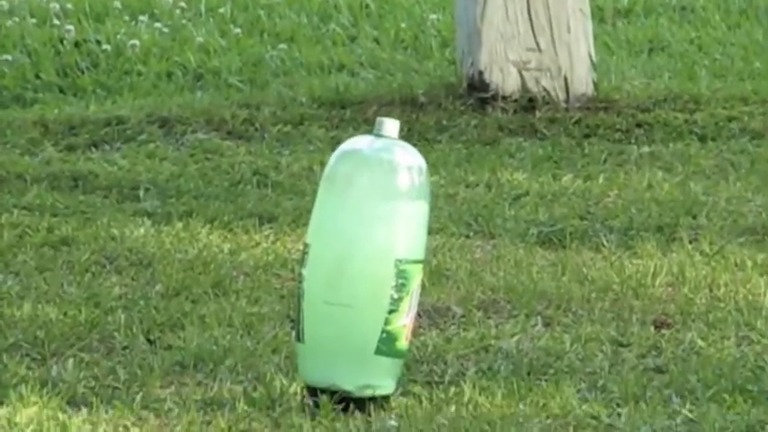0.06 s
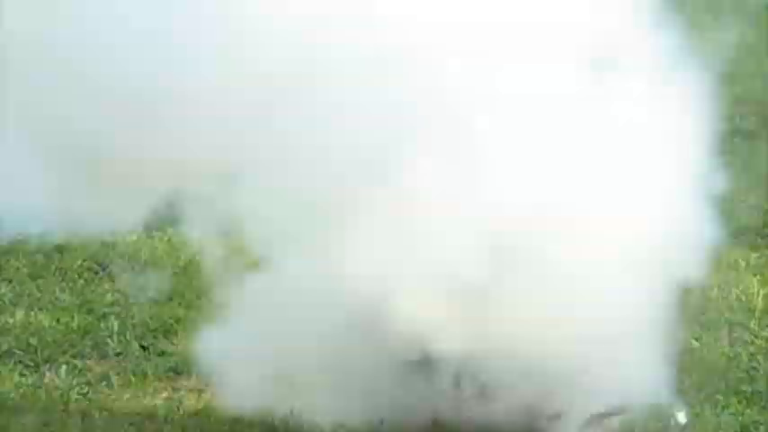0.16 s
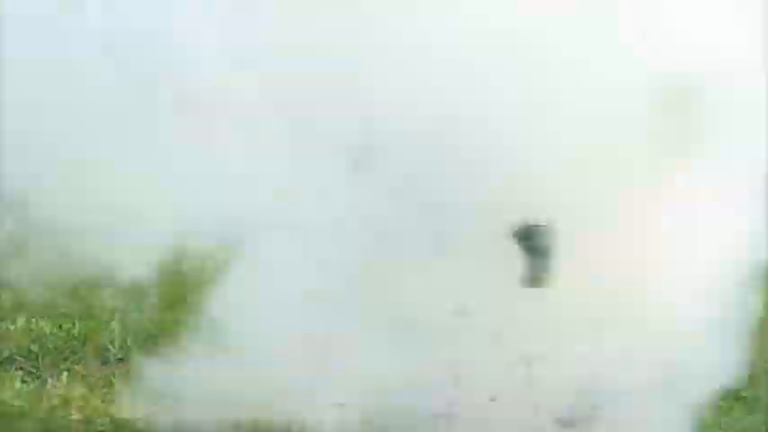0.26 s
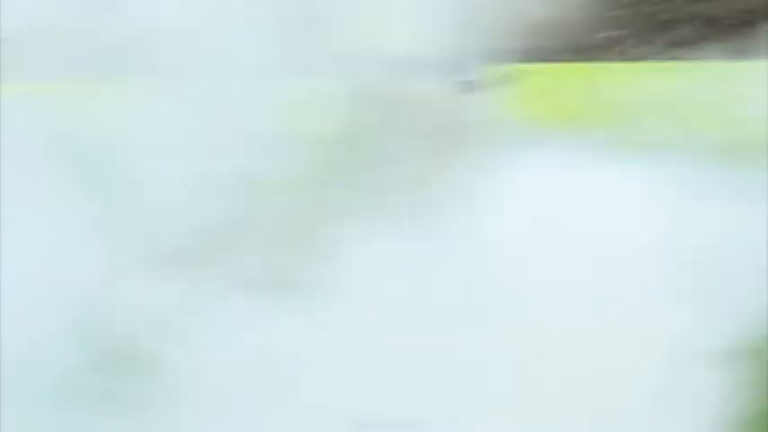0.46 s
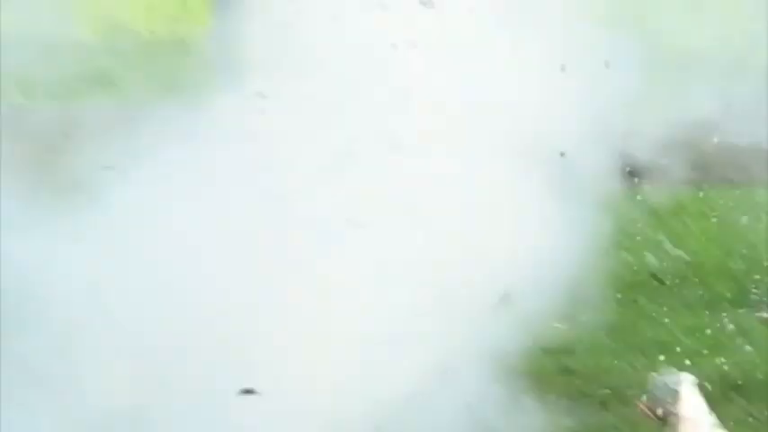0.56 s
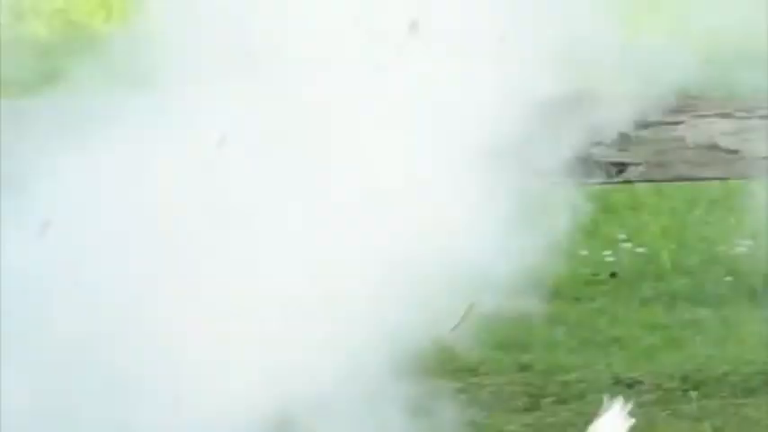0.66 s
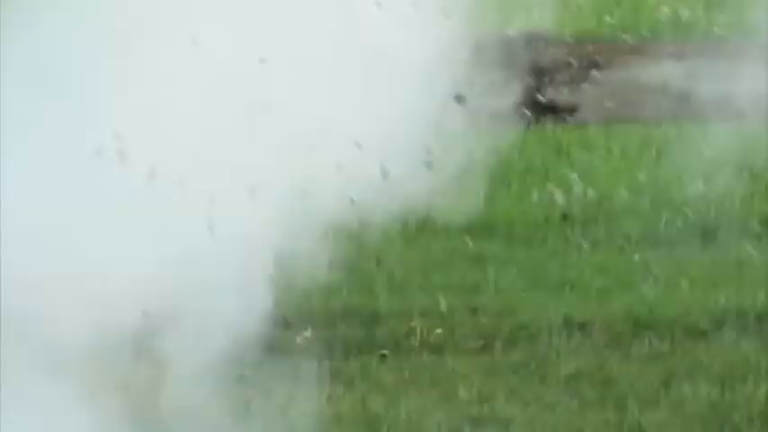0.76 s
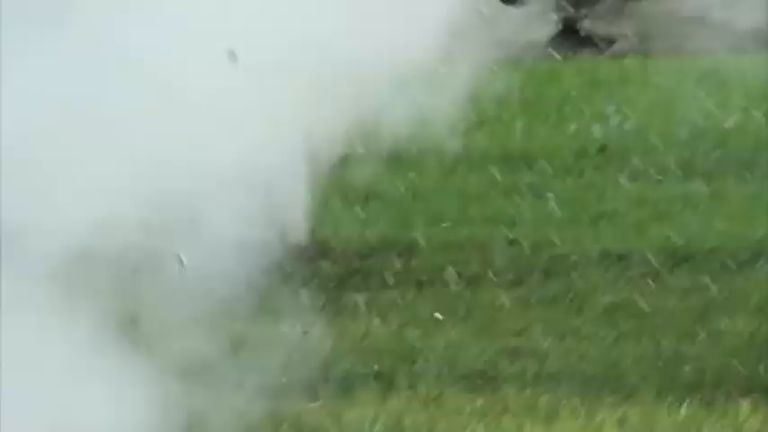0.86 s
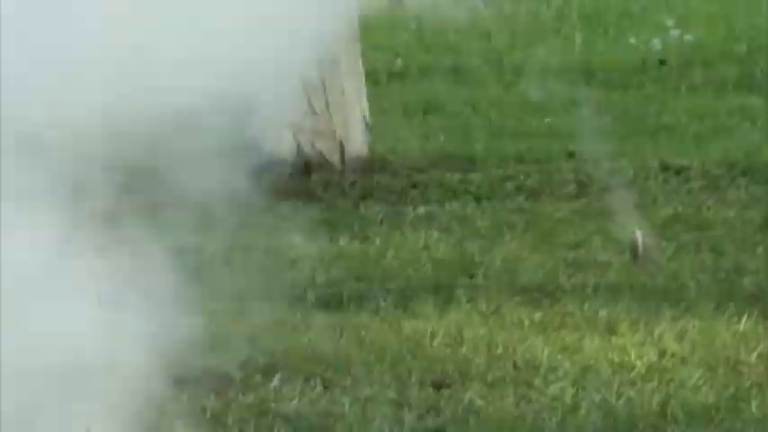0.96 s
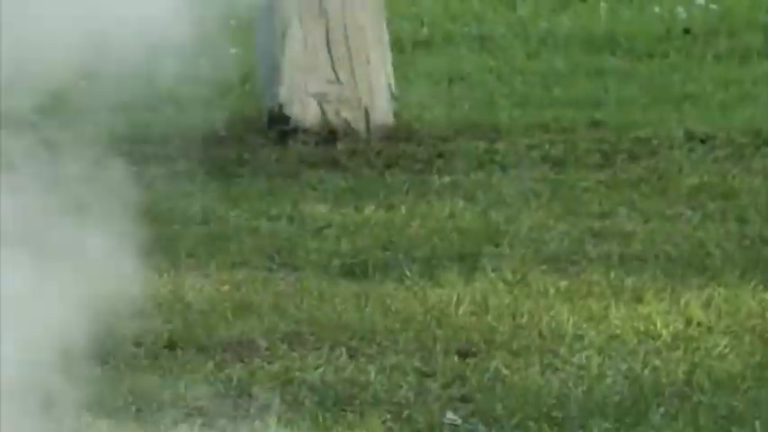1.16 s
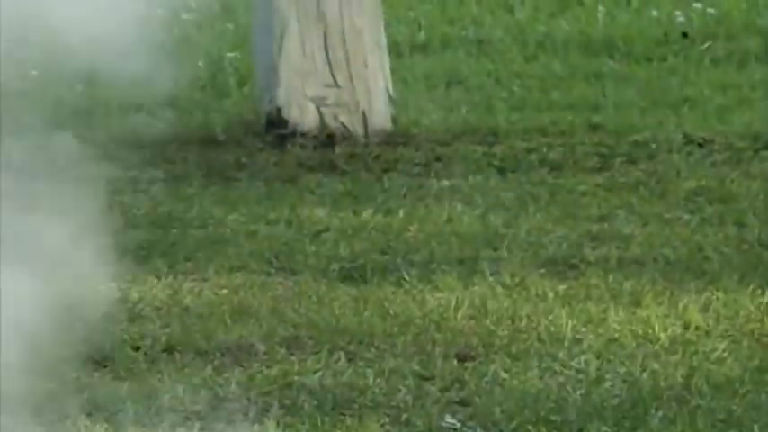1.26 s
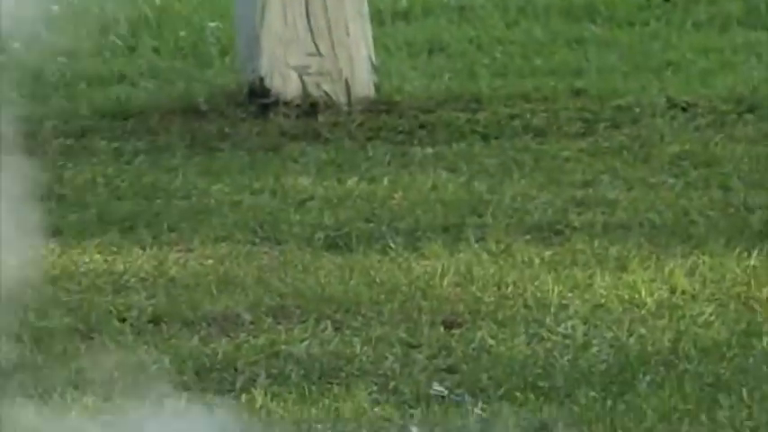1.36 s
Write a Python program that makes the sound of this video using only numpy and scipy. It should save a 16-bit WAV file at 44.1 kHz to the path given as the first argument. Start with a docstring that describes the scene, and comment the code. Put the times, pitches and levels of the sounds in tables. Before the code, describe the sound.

One sharp, deep bang as a plastic bottle explodes on a lawn, distorting the microphone. A short rush of spray follows, with slapping echoes, a fading rumble and a few small ticks of falling debris over soft outdoor air.

```python
"""A pressurised plastic bottle bursts on a lawn and overloads the microphone.
The freed gas booms, the shell cracks apart and spray hisses out. The surroundings throw the bang
back as separate slaps and a long rolling rumble. Drops tick and patter, a gob of liquid splashes
and a scrap of plastic clatters down, all over a soft bed of outdoor air."""
import sys
import numpy as np
from scipy import signal
from scipy.fft import rfft, irfft
from scipy.io import wavfile

SR = 44100
rng = np.random.default_rng(int(sys.argv[2]) if len(sys.argv) > 2 else 0)


def store_pcm(level_fs):
    """Save levels as 16-bit WAV."""
    pcm = np.round(np.clip(level_fs, -1, 1) * 32767).astype(np.int16)
    wavfile.write(sys.argv[1], SR, np.atleast_2d(pcm).T)


N = 61739

BURST_S = 0.2108
BOOM_HZ, BOOM_DB, BOOM_T60, BOOM_LEAD_S = 209.2, 20.5, 0.031, 0.001  # the main swing of the freed gas
CRACK_DB, CRACK_RISE_S, CRACK_HOLD_S, CRACK_T60 = 6, 0.0026, 0.01, 0.019
SPRAY_DB, SPRAY_HOLD_S, SPRAY_T60 = -12, 0.05, 0.21
LAWN_DELAY_S, LAWN_GAIN = 0.0029, 0.12
SLAP_RISE_S, SLAP_T60, THUMP_LOW_CUT_HZ = 0.0017, 0.062, 112
TICK_RISE_S, GRIT_GAIN = 0.00022, 0.31
SPLASH_S, SPLASH_DB, SPLASH_T60 = 0.7026, -23.5, 0.13
DROPLETS_PER_S, DROPLET_SPREAD_DB = 2500, 4
START_PING_S, START_PING_HZ, START_PING_DB, START_PING_T60 = 0.00033, 804, -15, 0.018
CLIP_CEILING, CLIP_HARDNESS, HIGH_CUT_HZ = 0.99, 23, 15800

# Tone colours of the noise layers. Each row: frequency in Hz, relative level in dB.
AIR_EQ = [(25, -26), (60, -2), (130, 13), (400, 0), (1100, 1.5), (2200, -2), (4500, -7), (7800, -20),
          (9500, -29), (12500, -31), (15500, -41)]
DRIZZLE_EQ = [(1000, -10), (4000, 3), (7500, 12.5), (9500, -1), (12500, -8), (15500, -21)]
GRIT_EQ = [(200, -17), (1500, 0), (5000, 8), (8000, -20), (10000, -19), (13000, -23), (16000, -31)]
SPLASH_EQ = [(300, -11), (2000, 0), (5000, 1), (7500, 1), (9500, -33), (16000, -50)]
RUMBLE_EQ = [(25, -42), (60, -27), (120, -7), (190, 0.5), (320, -2.5), (500, -11), (720, -10), (950, -17),
             (2000, -23), (5000, -54), (16000, -84)]
HISS_EQ = [(100, -25), (500, -5), (1200, -3), (2500, 3), (4800, 0.5), (6000, -6), (7500, -4.5),
           (8500, -13.5), (10000, -28), (12500, -47), (15500, -52)]
SLAP_EQ = [(100, -7), (500, -2.5), (1300, 3.5), (2500, -6), (5000, -16), (7500, -22), (10000, -36),
           (16000, -55)]
SPRAY_EQ = [(40, -34), (140, -14), (300, 2), (480, -0.5), (700, -12.5), (950, -12.5), (3000, -16.5),
            (7500, -16.5), (9500, -27.5), (15500, -38)]
CRACK_EQ = [(40, -35), (200, 0.5), (520, 1.5), (800, -3), (1200, -8), (2100, -2), (3000, -11.5),
            (7000, -10.5), (10000, -26), (16000, -31)]
# Fader rides of the long layers. Each row: time in seconds, level in dB.
AIR_RIDE = [(0, -38), (.04, -36), (.09, -29.5), (.14, -27.5), (.2, -27.5), (.9, -32), (1.08, -28.5),
            (1.19, -31.5), (1.3, -26.5), (1.4, -28.5)]
DRIZZLE_RIDE = [(.22, -38), (.35, -36), (.48, -37), (.6, -54), (.85, -62), (.91, -39.5), (1.02, -66),
                (1.05, -39), (1.1, -42.5), (1.15, -50), (1.4, -52)]
RUMBLE_RIDE = [(.22, -36), (.27, -21.5), (.31, -23.5), (.36, -21.5), (.45, -21), (.55, -24.5), (.67, -19.5),
               (.77, -16.5), (.83, -19.5), (.92, -21.5), (1.02, -24), (1.15, -24.5), (1.26, -24.5),
               (1.4, -26)]
HISS_RIDE = [(.22, -16.5), (.33, -29.5), (.42, -27), (.5, -26.5), (.66, -29), (.72, -26.5), (.8, -29),
             (.9, -33), (1.0, -41), (1.4, -49)]
# Stereo image of the noise. Each row: frequency in Hz, left-right correlation (1 is mono).
STEREO_LIKENESS = [(25, 0.69), (60, 0.99), (130, 1), (300, 0.98), (700, 0.9), (1400, 0.67), (2800, 0.11),
                   (5600, 0.06), (15000, 0.16)]
# Low swells of air. Each row: centre in seconds, length in seconds, level in dB, pitch in Hz.
AIR_SWELLS = [(0.063, 0.046, -27, 132), (0.125, 0.03, -20.5, 122.8), (1.25, 0.051, -22.5, 125),
              (1.317, 0.033, -20, 132.4)]
# Touchdowns of the plastic scrap. Each row: start in seconds, level in dB.
SCRAP_HITS = [(.8749, -20.5), (0.876, -18.5), (0.8776, -15.5)]
# Modes of the scrap. Each row: pitch in Hz, level in dB relative to the hit, T60 in seconds.
SCRAP_MODES = [(1070, -0.5, 0.025), (1900, -9, 0.0065), (2820, 1, .009), (3300, -5, 0.015),
               (4720, -2, 0.012), (6660, -6.5, 0.012), (7350, 1, 0.0063), (11000, -14, .005)]
# Drops landing. Each row: start in seconds, level in dB, pitch in Hz, T60 in seconds,
# pan as left minus right in dB.
DROP_TICKS = [(0.3254, -11, 11500, 0.0021, 18.5), (0.326, -8.5, 7200, 0.003, 0),
              (.7026, -10.5, 4650, .005, 10), (1.037, -24.5, 7450, .007, -4),
              (1.2978, -17, 3500, 0.0098, -1), (1.3762, -6, 7900, 0.0033, -14.5)]
# Slaps off the surroundings. Each row: start in seconds, thump level in dB, thump pitch in Hz,
# thump T60 in seconds, crack level in dB.
SLAPS = [(.3272, -5, 370, .045, -24), (.3395, -9, 370, .07, -33), (.433, -17, 300, .07, -32),
         (.62, -15, 265, .08, -36), (.7048, -4, 195, .045, -26), (.7205, -16, 720, .035, -32),
         (.803, -14, 260, .06, -28), (.8365, -2, 190, .05, -33), (.877, -19, 210, .04, -19),
         (1.087, -17, 600, .025, -22), (1.27, -20, 420, .03, -27)]
# Low push and hollow ring of the bang. Each row: pitch in Hz, level in dB, T60 in seconds.
BANG_MODES = [(56, -19, 0.044), (301.5, -8, 0.22), (478.4, 6, 0.053), (599, 5.5, 0.049)]


def amp(db):
    """Decibels to gain."""
    return 10 ** (np.asarray(db) / 20)


def curve(points):
    """A frequency table read at every FFT bin, on a log-frequency axis."""
    hz, value = np.transpose(points)
    return np.interp(np.log(np.fft.rfftfreq(N, 1 / SR) + 1), np.log(hz + 1), value)


def fader(ride):
    """A fader ride as gain per sample."""
    return amp(np.interp(np.arange(N) / SR, *np.transpose(ride)))


def since(start):
    """Seconds since start, zero before it."""
    return np.maximum(np.arange(N) / SR - start, 0)


def envelope(start, rise, t60, hold=0):
    """Linear attack; from hold seconds after the start, a 60 dB fall every t60 seconds."""
    return np.minimum(since(start) / rise, 1) * amp(-60 * since(start + hold) / t60)


def tone(start, hz, phase=0):
    """A sine that starts swinging at start."""
    return np.sin(2 * np.pi * hz * since(start) + phase)


def noise(eq):
    """Stereo noise of rms 1, centred in the bass and wide in the treble."""
    mid, side = rfft(rng.standard_normal((2, N)))
    likeness = curve(STEREO_LIKENESS)
    mid, side = mid * np.sqrt(1 + likeness), side * np.sqrt(1 - likeness)
    stereo = irfft(np.array([mid + side, mid - side]) * amp(curve(eq)), N)
    return stereo / stereo.std()


def outdoors():
    """The bed: outdoor air with a few low swells."""
    t = np.arange(N) / SR
    air = noise(AIR_EQ) * fader(AIR_RIDE)
    for centre, length, db, hz in AIR_SWELLS:
        swell = np.exp(-(2 * (t - centre) / length) ** 2)
        air += amp(db) * swell * tone(0, hz, rng.uniform(0, 2 * np.pi))
    return air


def start_ping():
    """A brief ping near 800 Hz at the very start."""
    decay = envelope(START_PING_S, TICK_RISE_S, START_PING_T60)
    return amp(START_PING_DB) * tone(START_PING_S, START_PING_HZ) * decay


def drizzle():
    """Fine droplets patter on the grass after the burst: tiny clicks that blur into fizz."""
    sizes = amp(DROPLET_SPREAD_DB * np.minimum(rng.exponential(1, (2, N)), 4))
    polarity = rng.choice([-1, 1], (2, N))
    landings = rng.random((2, N)) < DROPLETS_PER_S / SR
    fizz = irfft(rfft(sizes * polarity * landings) * amp(curve(DRIZZLE_EQ)), N)
    return fizz / fizz.std() * fader(DRIZZLE_RIDE) * (since(BURST_S) > 0)


def scrap_clatter():
    """A piece of the shell touches down in quick contacts, each ringing its modes."""
    out = np.zeros((2, N))
    for start, hit_db in SCRAP_HITS:
        for hz, db, t60 in SCRAP_MODES:
            phase = rng.uniform(0, 2 * np.pi) + rng.uniform(0, np.pi, (2, 1))  # per side, for width
            out += amp(hit_db + db) * tone(start, hz, phase) * envelope(start, TICK_RISE_S, t60)
    return out


def falling_drops():
    """Drops tick with a brief, gritty ring; a larger gob splashes."""
    grit = GRIT_GAIN * noise(GRIT_EQ)
    splash = amp(SPLASH_DB) * noise(SPLASH_EQ) * envelope(SPLASH_S, TICK_RISE_S, SPLASH_T60)
    ticks = np.zeros((2, N))
    for start, db, hz, t60, pan_db in DROP_TICKS:
        ring = tone(start, hz, rng.uniform(0, np.pi, (2, 1)))
        gains = amp([[db + pan_db / 2], [db - pan_db / 2]])
        ticks += gains * (ring + grit) * envelope(start, TICK_RISE_S, t60)
    return splash + ticks


def rolling_tail():
    """The surroundings scatter the bang into a low rumble and a hiss that dies sooner."""
    fade_in = np.minimum(since(BURST_S) / CRACK_RISE_S, 1)
    rumble = noise(RUMBLE_EQ) * fader(RUMBLE_RIDE)
    hiss = noise(HISS_EQ) * fader(HISS_RIDE)
    return fade_in * (rumble + hiss)


def slap_echoes():
    """Each large reflector returns a short thump with a dulled crack."""
    thumps, crack_gain = np.zeros((2, N))
    for start, thump_db, hz, t60, crack_db in SLAPS:
        thumps += amp(thump_db) * tone(start, hz) * envelope(start, SLAP_RISE_S, t60)
        crack_gain += amp(crack_db) * envelope(start, SLAP_RISE_S, SLAP_T60)
    low_cut = signal.butter(2, THUMP_LOW_CUT_HZ, "high", fs=SR, output="sos")
    return crack_gain * noise(SLAP_EQ) - signal.sosfilt(low_cut, thumps)


def bottle_burst():
    """The freed gas swings heavily; the tearing shell and rushing spray also bounce off the lawn."""
    boom = np.zeros(N)
    for hz, db, t60 in [(BOOM_HZ, BOOM_DB, BOOM_T60), *BANG_MODES]:
        phase = 2 * np.pi * hz * BOOM_LEAD_S  # opening mid-swing makes the shock front
        boom -= amp(db) * tone(BURST_S, hz, phase) * envelope(BURST_S, 2 / SR, t60)
    crack = amp(CRACK_DB) * noise(CRACK_EQ) * envelope(BURST_S, CRACK_RISE_S, CRACK_T60, CRACK_HOLD_S)
    spray = amp(SPRAY_DB) * noise(SPRAY_EQ) * envelope(BURST_S, CRACK_RISE_S, SPRAY_T60, SPRAY_HOLD_S)
    bounce = LAWN_GAIN * np.roll(crack + spray, round(LAWN_DELAY_S * SR), axis=1)
    return boom + crack + spray + bounce


def scene():
    """The mix: the bang and its reflections, falling debris, the outdoor bed and the ping."""
    bang = bottle_burst() + rolling_tail() + slap_echoes()
    return bang + falling_drops() + scrap_clatter() + drizzle() + outdoors() + start_ping()


def record(dry):
    """The microphone clips on the bang, then a high cut trims the very top."""
    clipped = dry / (1 + abs(dry / CLIP_CEILING) ** CLIP_HARDNESS) ** (1 / CLIP_HARDNESS)
    high_cut = signal.firwin(255, HIGH_CUT_HZ, window=("kaiser", 8), fs=SR)
    return signal.oaconvolve(clipped, high_cut[None], "same")


dry = scene()
out = record(dry)
store_pcm(out)
```